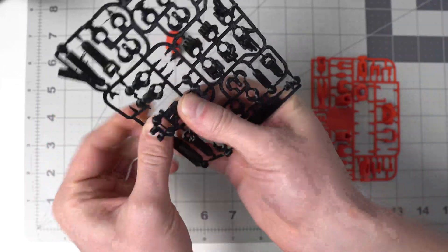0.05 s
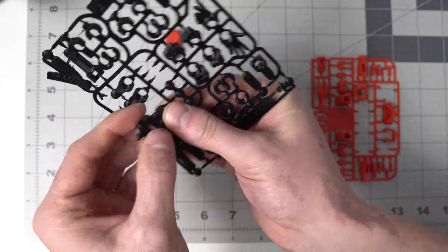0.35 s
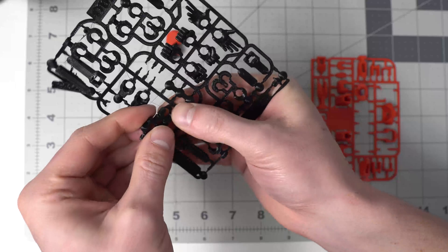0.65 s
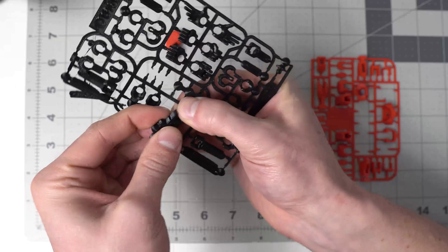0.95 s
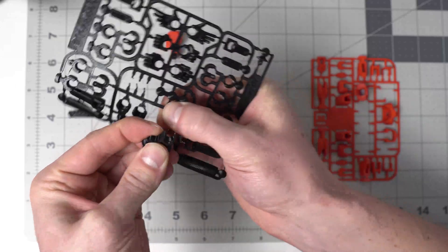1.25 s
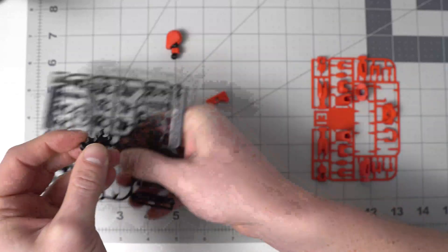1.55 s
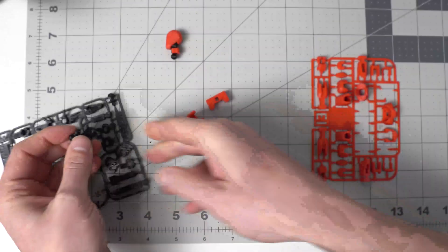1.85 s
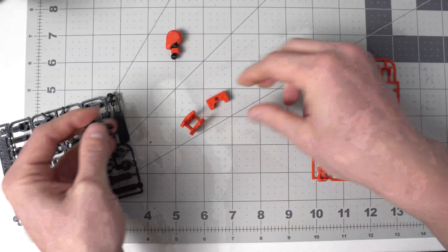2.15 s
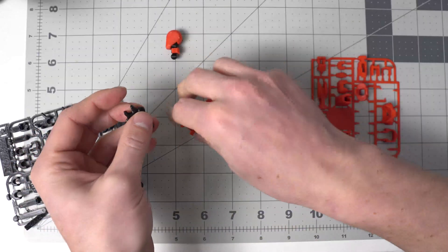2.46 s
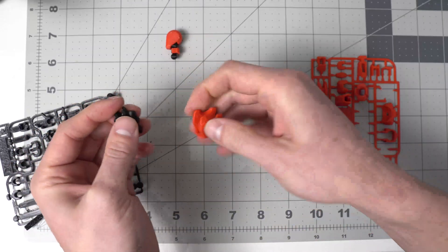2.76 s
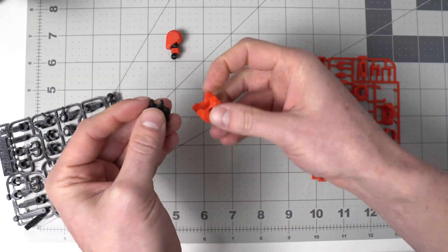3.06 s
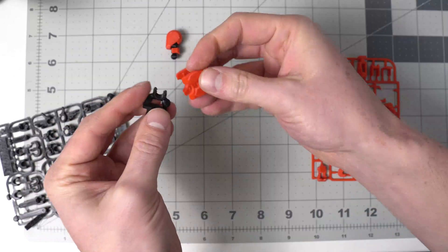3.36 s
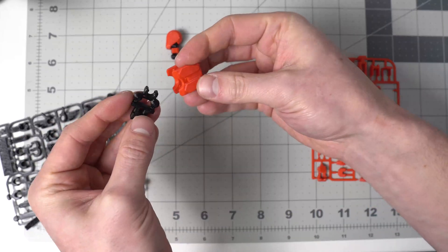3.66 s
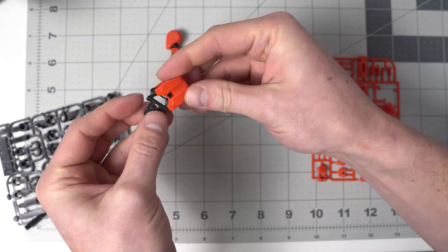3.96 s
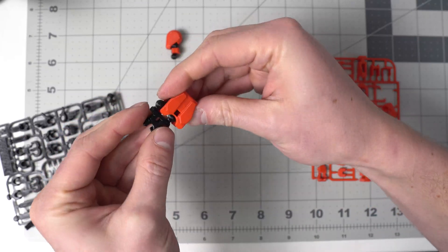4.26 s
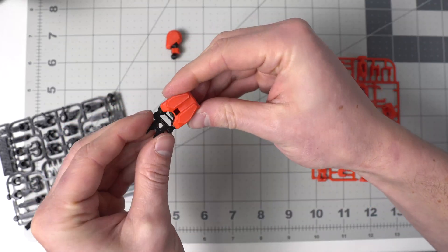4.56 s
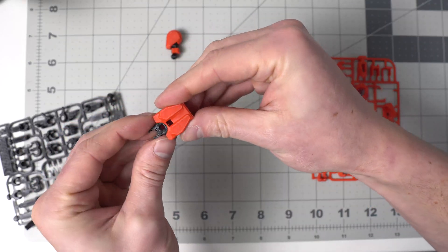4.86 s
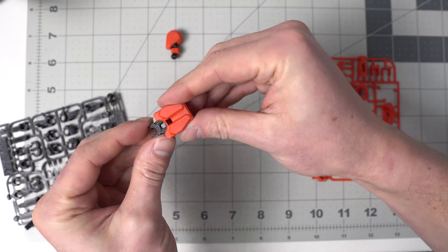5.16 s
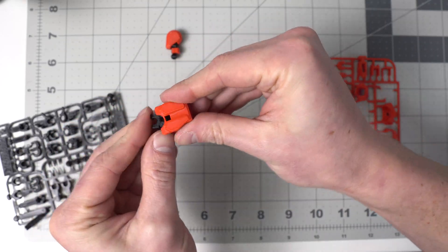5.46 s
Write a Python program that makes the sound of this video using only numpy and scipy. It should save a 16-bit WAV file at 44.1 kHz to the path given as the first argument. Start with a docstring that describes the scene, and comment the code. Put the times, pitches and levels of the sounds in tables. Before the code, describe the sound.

Close up in a quiet little room, light plastic ticks lead to a crisp snap as a piece comes off its moulded sheet. The loudest sound follows: the sheet lands on a mat, rattling and settling quickly. A few soft low bumps pass, then tiny scrapes and ticks end in a neat click as two plastic pieces join. Faint ventilation runs underneath, with a faint distant whine near the end.

```python
"""Plastic ticks and creaks, then snaps: a small part is twisted off its moulded sheet until the gate breaks.
The sheet drops on a cutting mat, clatters and rocks to rest; two small parts are rubbed and clicked together.
Each contact is a noise crack plus damped modes, with two rebounds; rubbing is stick-slip on the same modes.
Heard close up in a small, quiet room, with soft low bumps, ventilation rumble and a faint distant whine."""
import sys
import numpy as np
from scipy import signal
from scipy.fft import rfft, irfft
from scipy.io import wavfile
from scipy.ndimage import uniform_filter1d

SR = 44100
rng = np.random.default_rng(int(sys.argv[2]) if len(sys.argv) > 2 else 0)


def bounce(signal):
    """Save signal as a 16-bit WAV file at the path given by the first command-line argument."""
    frames = np.transpose(np.atleast_2d(signal))
    limited = np.clip(frames, -1, 1)
    pcm = np.round(limited * 32767).astype(np.int16)
    wavfile.write(sys.argv[1], SR, pcm)


N = 243661
TIME = np.arange(N) / SR
AGE = TIME[:SR // 2]  # s since a blow
SHEET_GAP_S = .0092  # to the sheet's first rebound
FLAT_S = 1.92  # the dropped sheet comes flat

# crack spectrum of held sheet and gate: f/Hz, level/dB
CRACK = [(150, -19), (500, 6), (1200, 10), (2500, 11.5), (5000, 4.5), (7000, 2), (10000, -7.5),
         (15500, -16)]


def twisted_sheet():
    """The held sheet ticks as the gate strains; fingers rub and damp it."""
    # ticks: t/s, level/dB, tilt/(dB/oct), flexing bar f/Hz, rebound loss/dB
    twists = [(.2576, -53.5, 0, 4600, 3), (.2946, -55.5, 5, 11800, 2), (.5593, -37, 4.5, 4560, 9.5),
              (.6433, -48, -1.5, 850, 8), (1.4020, -63, 0, 4800, 0.5), (1.4614, -55, 1, 1760, 24)]
    # finger strokes: t/s, length/s, level/dB
    rubs = [(.13, 0.051, -74.5), (.255, 0.079, -65), (.33, 0.085, -74.5), (1.33, 0.27, -74)]
    # held sheet modes: f/Hz, level/dB, t60/s
    modes = [(850, -16, 0.034), (1760, -15, 0.014), (3150, -8.5, 0.025), (3770, -6, 0.009),
             (4650, -3.5, 0.0075), (4860, -16.5, 0.033), (5580, -3, 0.0086), (7060, -12, 0.006),
             (10500, -7, 0.0036), (12000, -12, 0.0042), (13000, -8, .004)]
    contacts = rebounding(twists, SHEET_GAP_S)
    ticks = clicks(contacts, modes, CRACK, crack_db=0, crack_t60_s=.017, scatter_db=1, focus_db=10.5)
    return ticks + friction(rubs, modes, CRACK, slips_per_s=1100, spread_db=7, crack_db=4)


def gate_snap():
    """The gate breaks and the freed sheet kicks back."""
    # break and kick: t/s, level/dB, tilt/(dB/oct), main f/Hz, rebound loss/dB
    snaps = [(1.2226, -25, 1.5, 1700, 16.5), (1.2487, -45.5, -0.5, 834, 15)]
    # gate modes: f/Hz, level/dB, t60/s
    modes = [(466, -10.5, 0.013), (816, 1, 0.012), (1596, 5.5, 0.0073), (2110, -2, 0.0084),
             (2480, -9, 0.016), (3400, -2, 0.0045), (3910, -3, 0.0029), (6100, -8, 0.0042),
             (6840, -11, 0.0034), (8100, -8.5, 0.0055), (12600, -9, 0.0025)]
    contacts = rebounding(snaps, gap_s=.01)
    return clicks(contacts, modes, CRACK, crack_db=-4.5, crack_t60_s=.015, scatter_db=2, focus_db=2)


def dropped_sheet(crack_db=-3.5, lattice_db=-8, thud_fade_db_per_s=27):
    """Each landing bar rings at its own pitch, shakes the lattice of parts and thuds on the mat."""
    # loose sheet modes: f/Hz, level/dB, t60/s
    modes = [(622, -26.5, .07), (1125, -18, 0.085), (1463, -20, .045), (1830, -14.5, 0.021),
             (2173, -21, 0.04), (2430, -20, 0.061), (3200, -18.5, 0.039), (3440, -5, 0.017),
             (3610, -20, 0.078), (3953, -4.5, 0.013), (4200, -22.5, 0.095), (4600, -5.5, 0.01305),
             (5110, -5, .012), (5500, -4, 0.012), (5730, -10.5, 0.010), (6710, -18.5, 0.018),
             (7540, -13, .01), (8180, -14, 0.0089), (11850, -19.5, 0.0044)]
    # spectra of the crack, the lattice's many weak modes and the mat: f/Hz, level/dB
    crack_spectrum = [(150, -23), (600, -14), (1500, -4.5), (3000, 3), (5700, 4.5), (7500, -7),
                      (10000, -18), (15500, -20.5)]
    lattice_spectrum = [(300, -7), (1100, -1), (1800, 3), (4000, 0.5), (5700, -5), (7500, -12),
                        (12000, -28)]
    mat_spectrum = [(50, -23.5), (110, -2), (200, -1), (380, -4.5), (650, -4), (900, -8.5), (1150, 1.5),
                    (1800, -2), (3000, -20), (8000, -46.5)]
    # sheet scuffing over the mat: t/s, length/s, level/dB
    scuffs = [(1.715, 0.23, -51.5), (1.97, 0.17, -57)]
    out = np.zeros(N)
    for s, db, tilt_db_oct, bar_hz in rebounding(landings() + relaxing_taps(), SHEET_GAP_S):
        bar = ring(struck_at(modes, bar_hz, focus_db=14), scatter_db=1.5)
        crack = undb(crack_db) * burst(crack_spectrum, t60_s=.0072)
        lattice = undb(lattice_db) * burst(lattice_spectrum, t60_s=.14)
        add(out, s, blow(bar + crack + lattice, db, tilt_db_oct))
        # the soft mat evens out the blows; its thud dies once the sheet lies flat
        thud_db = -32.5 + .28 * db - thud_fade_db_per_s * max(s - FLAT_S, 0)
        add(out, s, blow(burst(mat_spectrum, t60_s=.08), thud_db, tilt_db_oct=0))
    return out + friction(scuffs, modes, crack_spectrum, slips_per_s=1100, spread_db=3.5, crack_db=8.5)


def landings(middle_bar_hz=3586, tilt_per_oct=3.6, tilt_per_db=.1379, dulling_per_s=7.1):
    """Contacts with the mat: short bars and hard blows are brighter; the clatter dulls as it settles."""
    # sheet landing and slapping flat: t/s, level/dB, bar f/Hz, rebound loss/dB
    hits = [(1.7142, -34, 1860, 10), (1.7218, -33, 6120, 4), (1.7729, -24.5, 3480, 10.5),
            (1.8137, -38.5, 7300, -0.5), (1.861, -44, 1880, 0.5), (1.9102, -28, 3540, 5),
            (1.917, -20.5, 4380, 14), (1.9211, -13.5, 4910, 19), (1.9235, -16.5, 3390, 12),
            (1.9595, -29, 3450, 15), (1.9700, -34, 3430, 15), (2.0229, -35, 3500, 28),
            (2.0613, -55, 3400, 14), (2.0800, -38.5, 3570, 9.5), (2.14, -38.5, 5400, 11),
            (2.1557, -40, 3740, 13), (2.1988, -46, 2410, 8), (2.216, -46.5, 1140, 8.5)]
    rows = []
    for s, db, bar_hz, loss_db in hits:
        bar_tilt = 3.5 + tilt_per_oct * np.log2(bar_hz / middle_bar_hz)
        tilt_db_oct = bar_tilt + tilt_per_db * db - dulling_per_s * (s - FLAT_S)
        rows.append((s, db, tilt_db_oct, bar_hz, loss_db))
    return rows


def relaxing_taps(start_s=2.28, gap_s=.052, slowing=1.42, tilt_db_oct=-8.5, bar_hz=1410, loss_db=7):
    """The sheet relaxes on the mat in four dull taps, ever slower and fainter."""
    return [(start_s + gap_s * k ** slowing, -57.5 - 4 * k, tilt_db_oct, bar_hz, loss_db)
            for k in range(4)]


def joining_parts():
    """Two small hollow parts scrape, catch and click home."""
    # catches, then the peg seats: t/s, level/dB, tilt/(dB/oct), struck wall f/Hz, rebound loss/dB
    catches = [(3.8698, -56.5, 1.5, 8300, 9), (3.9162, -46, 2, 3820, 20), (3.9457, -48.5, 1, 2250, 4.5),
               (4.1437, -52, -2, 8750, 4), (4.1950, -62, -1, 8300, 0), (4.5205, -58.5, -2, 2340, 3),
               (4.6665, -55.5, -0.5, 8640, 8), (4.6990, -63.5, -1.5, 2330, 16),
               (4.8634, -39.5, 3.5, 7400, 18), (4.8790, -46, 3, 2400, 20)]
    # part on part, last the peg in its socket: t/s, length/s, level/dB
    slides = [(3.862, 0.049, -61), (3.935, 0.052, -64), (4.14, 0.094, -75.5), (4.50, 0.082, -73.5),
              (4.645, 0.039, -66.5), (4.8635, 0.012, -46)]
    # part modes: f/Hz, level/dB, t60/s
    modes = [(890, -2.5, 0.014), (2218, 1, 0.015), (2420, -9.5, 0.016), (3655, 0.5, 0.013),
             (4380, -4, 0.01), (5220, -5, 0.018), (7150, -14, 0.012), (7630, -7, 0.015), (8070, -9, 0.016),
             (8670, -5.5, 0.026)]
    # crack spectrum: f/Hz, level/dB
    crack = [(200, -19), (700, -1), (2000, 3), (5000, -1), (9000, -7), (10500, -17), (15500, -23)]
    contacts = rebounding(catches, gap_s=.017)
    ticks = clicks(contacts, modes, crack, crack_db=-3.5, crack_t60_s=.011, scatter_db=4.5, focus_db=11.5)
    return ticks + friction(slides, modes, crack, slips_per_s=600, spread_db=-4.5, crack_db=4)


def rebounding(contacts, gap_s, gap_shrink=.82, loss_growth=2.3, dulling_db_oct=2.5, wander_oct=.25):
    """Springy plastic comes back twice, sooner and duller each time, mostly weaker, on another spot."""
    rows = []
    for s, db, tilt_db_oct, hz, loss_db in contacts:
        second_hz, third_hz = hz * 2 ** (wander_oct * rng.standard_normal(2))
        third_s = s + gap_s * (1 + gap_shrink)
        rows += [(s, db, tilt_db_oct, hz),
                 (s + gap_s, db - loss_db, tilt_db_oct - dulling_db_oct, second_hz),
                 (third_s, db - loss_db * loss_growth, tilt_db_oct - 2 * dulling_db_oct, third_hz)]
    return rows


def clicks(contacts, modes, crack_spectrum, crack_db, crack_t60_s, scatter_db, focus_db):
    """Contacts on one object: each is a short crack plus the ring of the part."""
    out = np.zeros(N)
    for s, db, tilt_db_oct, focus_hz in contacts:
        body = ring(struck_at(modes, focus_hz, focus_db), scatter_db)
        crack = undb(crack_db) * burst(crack_spectrum, crack_t60_s)
        add(out, s, blow(body + crack, db, tilt_db_oct))
    return out


def friction(strokes, modes, crack_spectrum, slips_per_s, spread_db, crack_db):
    """Stick-slip: uneven tiny catches ring the part, swelling and dying with each stroke."""
    out = np.zeros(N)
    for s, length_s, db in strokes:
        n = int(length_s * SR)
        slipping = rng.random(len(AGE))[:n] < slips_per_s / SR
        size = rng.standard_normal(len(AGE))[:n]
        slips = slipping * np.sign(size) * undb(spread_db * np.abs(size)) * np.hanning(n) ** .5
        body = ring(modes, scatter_db=2) + undb(crack_db) * burst(crack_spectrum, t60_s=.009)
        scrape = unit(signal.fftconvolve(slips, body) + 1e-18)
        add(out, s, scrape * undb(db) * np.sqrt(n))
    return out


def struck_at(modes, focus_hz, focus_db, width_oct=.13):
    """The point of contact favours the modes around one pitch."""
    return [(hz, db + focus_db * np.exp(-(np.log2(hz / focus_hz) / width_oct) ** 2), t60_s)
            for hz, db, t60_s in modes]


def ring(modes, scatter_db):
    """Damped modes, neighbours in opposite phase; every contact drives another mix."""
    hz, db, t60_s = np.transpose(modes)
    size, detune = rng.standard_normal((2, len(hz)))
    gains = undb(db + scatter_db * size) * (-1) ** np.arange(len(hz))
    detuned_hz = hz * (1 + .0067 * detune)
    swing = sum(g * np.sin(2 * np.pi * f * AGE) * fade(d) for g, f, d in zip(gains, detuned_hz, t60_s))
    return unit(shape(swing, [(150, -12), (500, -1.5)]))  # small parts radiate little bass


def burst(spectrum, t60_s):
    """Dying noise: countless dense, damped modes."""
    return unit(shape(rng.standard_normal(len(AGE)) * fade(t60_s), spectrum))


def blow(sound, db, tilt_db_oct):
    """A harder contact is brighter; db is the level of its energy packed into 4 ms."""
    hardness = [(750, -2 * tilt_db_oct), (12000, 2 * tilt_db_oct)]
    return unit(shape(sound, hardness)) * undb(db) * np.sqrt(.004 * SR)


def room(x, wet_db, early_db=3, early_t60_s=.049, first_s=.004):
    """The table and near walls return a quick flurry, then a short tail whose treble dies first."""
    # room decay: f/Hz, t60/s
    decay = [(200, .36), (900, .27), (2200, 0.28), (5000, 0.19), (9000, 0.16)]
    # reflection spectrum: f/Hz, level/dB
    wall_spectrum = [(80, -13.5), (300, -3.5), (900, -1.5), (2000, -1), (3500, -4), (5500, -3), (8000, -1),
                     (15000, -9.5)]
    noise_bins = rfft(rng.standard_normal(len(AGE)))
    hz = np.fft.rfftfreq(len(AGE), 1 / SR)
    echoes = undb(early_db) * rng.standard_normal(len(AGE)) * fade(early_t60_s)
    for band_hz, t60_s in decay:
        band = along(hz, [(f, float(f == band_hz)) for f, _ in decay])
        echoes += irfft(noise_bins * band, len(AGE)) * fade(t60_s)
    onset = np.clip(AGE / first_s - 1, 0, 1)
    response = shape(unit(echoes * onset), wall_spectrum)
    return x + undb(wet_db) * signal.fftconvolve(x, response)[:N]


def bumps(length_s=.127, hz=158.3):
    """Soft low swells with no attack while the hands move."""
    # bumps: t/s, level/dB
    swells = [(2.71, -63), (3.30, -60), (3.47, -61.5)]
    out, n = np.zeros(N), int(length_s * SR)
    for s, db in swells:
        add(out, s, np.sqrt(2) * undb(db) * np.hanning(n) * np.sin(2 * np.pi * hz * AGE[:n]))
    return out


def ventilation(mid_db=-62.5):
    """Steady stereo rumble with microphone hiss."""
    # rumble and hiss spectrum: f/Hz, level/dB
    spectrum = [(12, -36), (20, 1), (44, -14.5), (202, -4), (315, -7), (352, -11.5), (382, -12.5),
                (534, -13), (649, -14), (705, -17), (2330, -26), (3260, -29), (15500, -34)]
    # stereo width: f/Hz, side minus mid/dB
    width = [(25, -4), (60, -11.5), (125, -21.5), (500, -16.5), (2000, -7), (8000, -0.5), (14000, 0.5)]
    mid, side = (unit(colour(rng.standard_normal(N), spectrum)) * np.sqrt(N) for _ in range(2))
    return undb(mid_db) * (mid + colour(side, width) * np.array([[1], [-1]]))


def distant_whine(waver_hz=9):
    """A faint, unsteady tone swells and sinks far away."""
    # whine contour: t/s, f/Hz, level/dB
    contour = [(4.699, 270, -89), (4.869, 336, -64.5), (4.999, 383.2, -73), (5.13, 384.5, -67.5),
               (5.28, 309.5, -69), (5.4, 269.2, -66.5), (5.53, 240, -66.5)]
    s, *columns = np.transpose(contour)
    hz, db = (np.interp(TIME, s, column) for column in columns)
    waver = unit(uniform_filter1d(rng.standard_normal(N), size=800)) * np.sqrt(N)
    phase = 2 * np.pi * np.cumsum(hz + waver_hz * waver) / SR
    return np.sqrt(2) * np.sin(phase) * undb(db) * (TIME > s[0])


def undb(db):
    """Decibels to gain."""
    return 10 ** (np.asarray(db) / 20)


def unit(x):
    """Scale to unit energy."""
    return x / np.sqrt(np.sum(x ** 2))


def fade(t60_s):
    """Exponential decay after a blow."""
    return np.exp(-np.log(1000) * AGE / t60_s)


def along(hz, points):
    """Interpolate (f/Hz, value) points on a log-frequency axis."""
    f, value = np.transpose(points)
    return np.interp(np.log(hz + 1), np.log(f), value)


def colour(x, spectrum):
    """Zero-phase filter for steady sounds."""
    gain = undb(along(np.fft.rfftfreq(len(x), 1 / SR), spectrum))
    return irfft(rfft(x) * gain, len(x))


def shape(x, spectrum):
    """Minimum-phase filter: a blow's attack stays sharp."""
    n = len(x)
    gain = undb(along(np.fft.rfftfreq(n, 1 / SR), spectrum))
    cepstrum = irfft(np.log(gain), n)
    cepstrum[1:n // 2] *= 2
    cepstrum[n // 2 + 1:] = 0
    return irfft(rfft(x) * np.exp(rfft(cepstrum)), n)


def add(track, s, sound):
    """Mix a sound in at s seconds."""
    i = int(s * SR)
    track[i:i + len(sound)] += sound[:N - i]


def scene():
    """All handling is straight ahead; the mat is a little further off than the hands."""
    in_hands = room(twisted_sheet(), wet_db=-9.5)
    in_hands += room(gate_snap(), wet_db=-12.5, early_db=5)
    in_hands += room(joining_parts(), wet_db=-11, early_db=8)
    on_mat = room(dropped_sheet(), wet_db=-7.5)
    return in_hands + on_mat + bumps() + ventilation() + distant_whine()


def record(dry):
    """Steep low-pass at 15.9 kHz."""
    return signal.sosfilt(signal.ellip(10, .2, 70, 15900, fs=SR, output="sos"), dry)


dry = scene()
out = record(dry)
bounce(out)
```